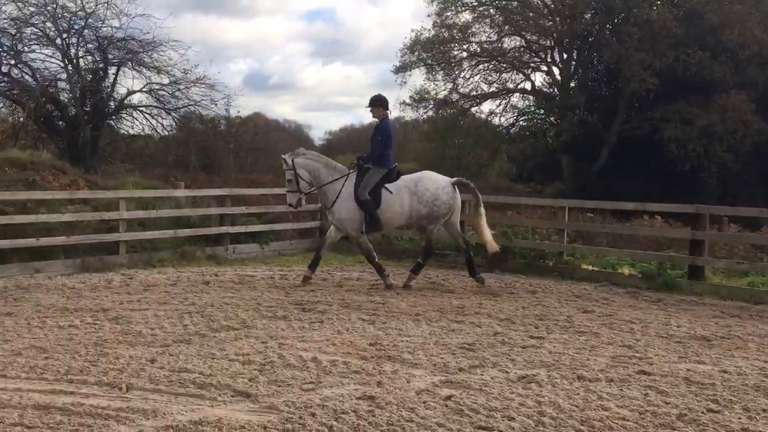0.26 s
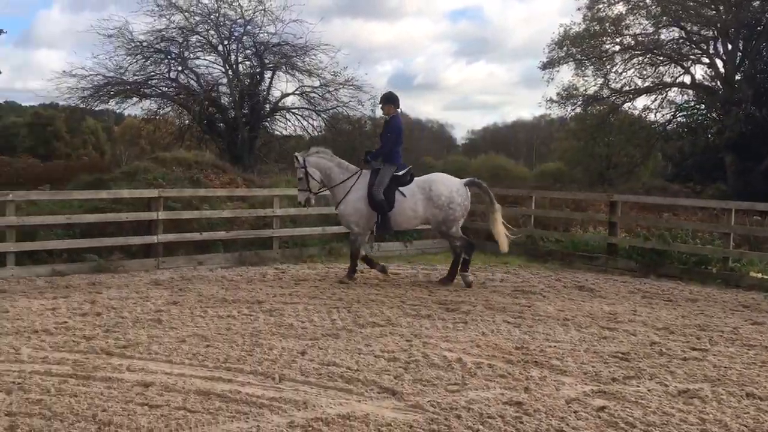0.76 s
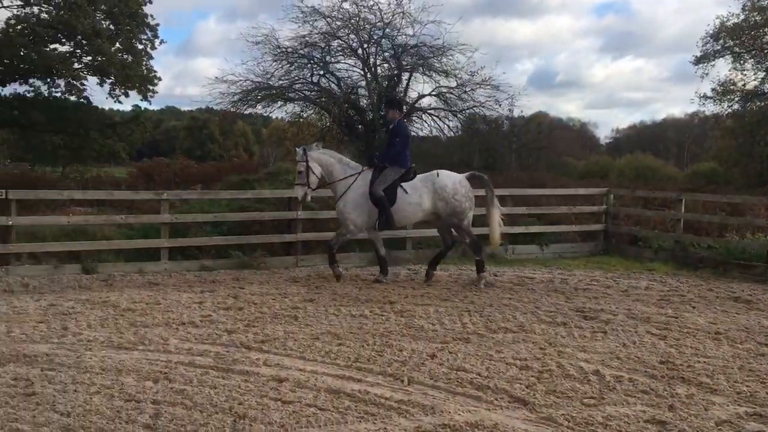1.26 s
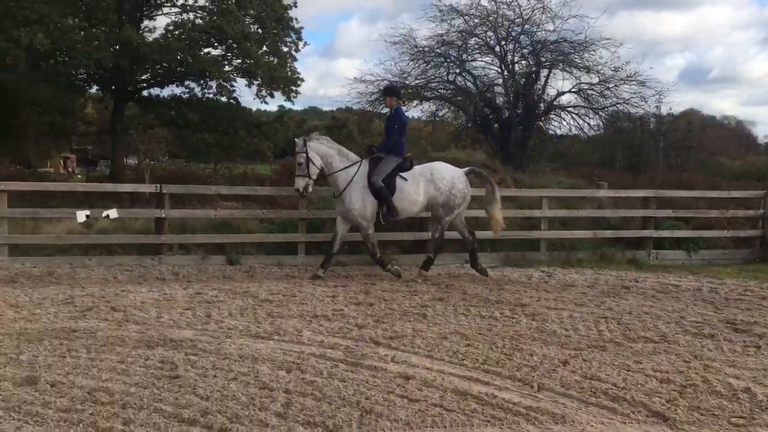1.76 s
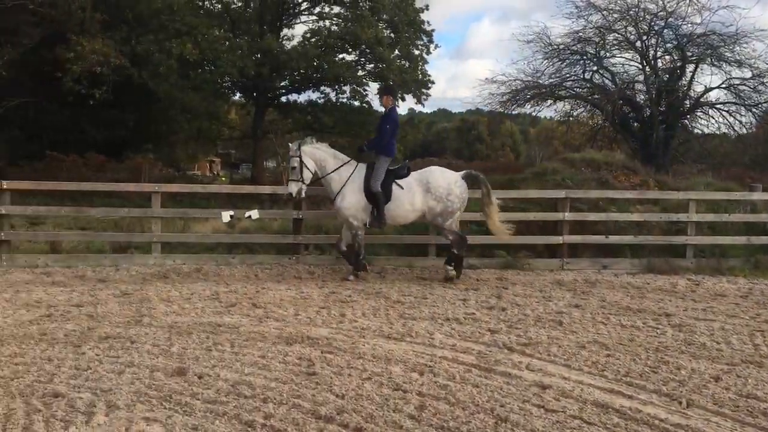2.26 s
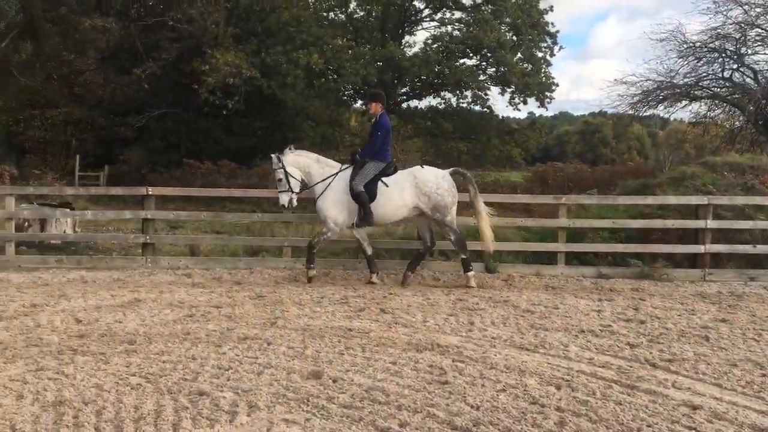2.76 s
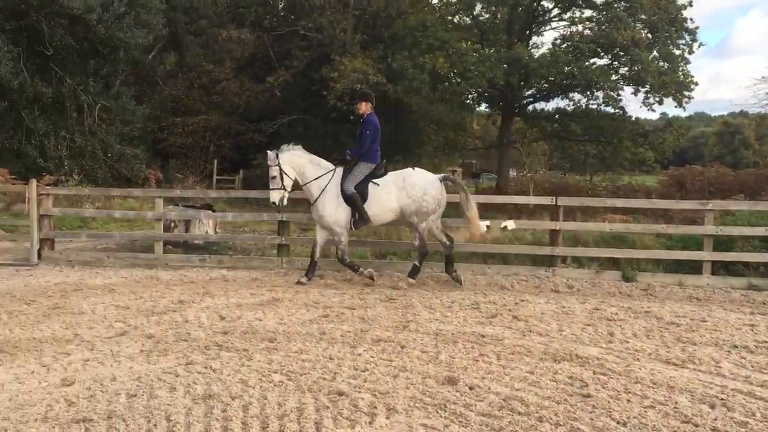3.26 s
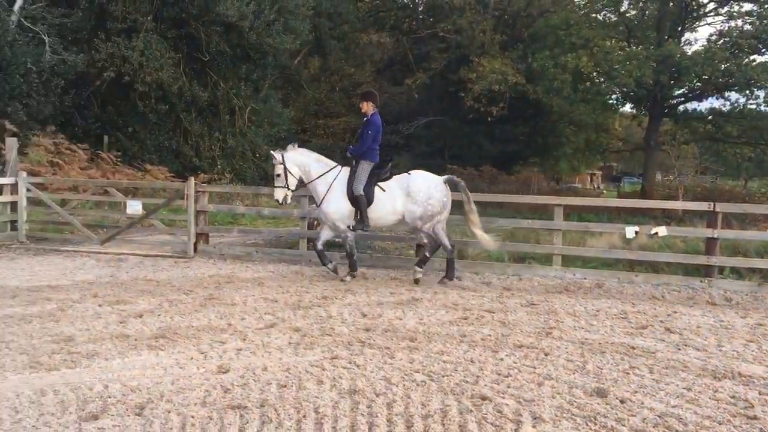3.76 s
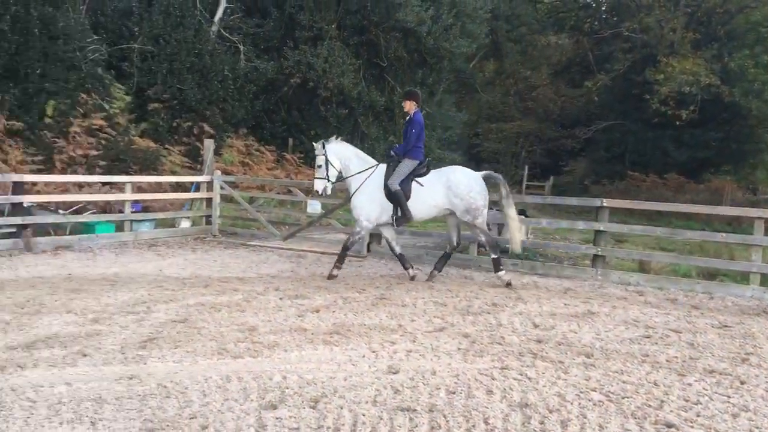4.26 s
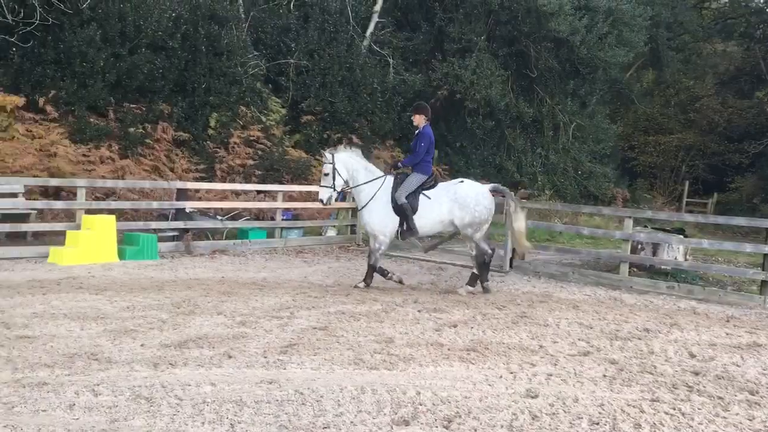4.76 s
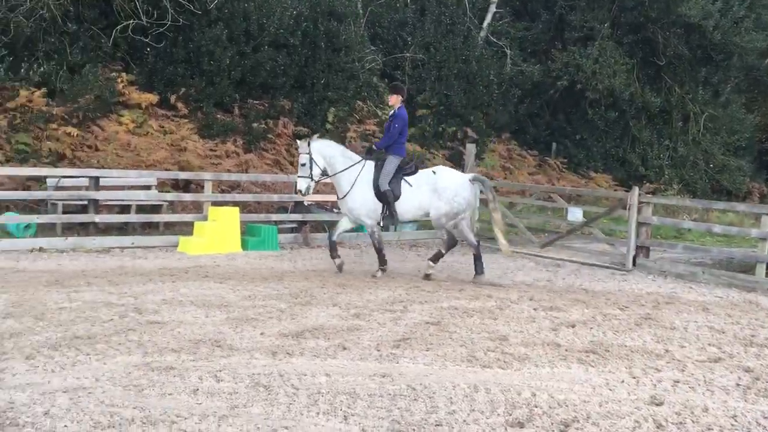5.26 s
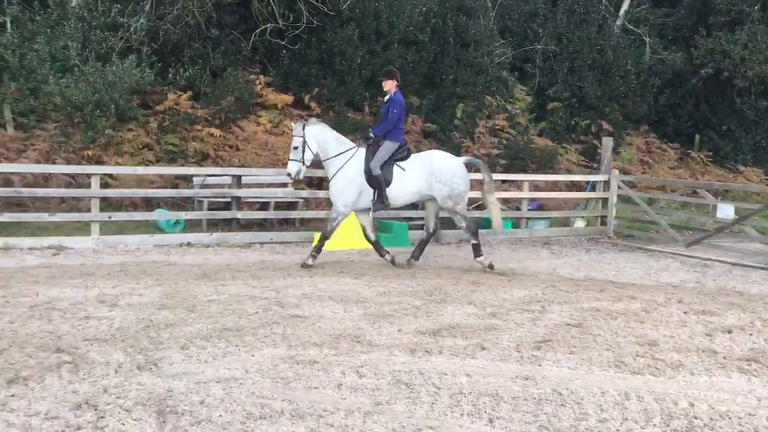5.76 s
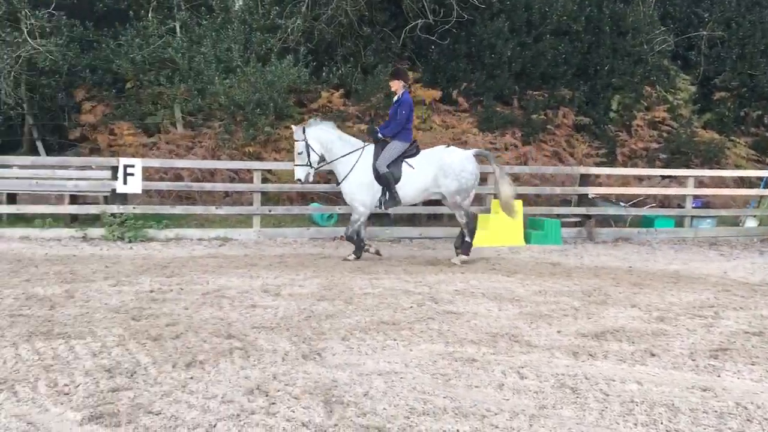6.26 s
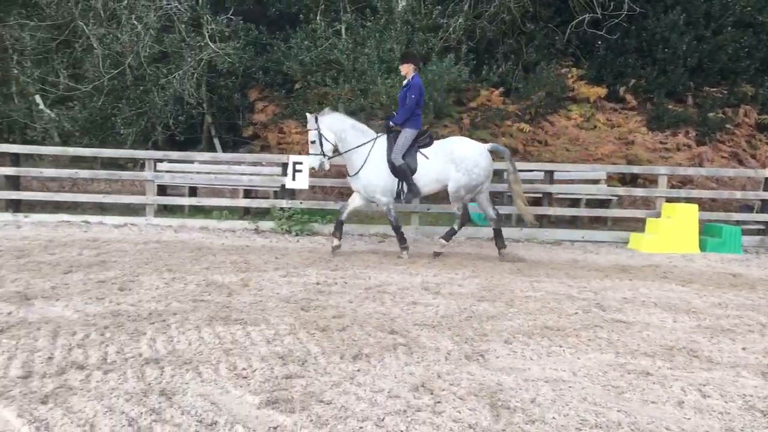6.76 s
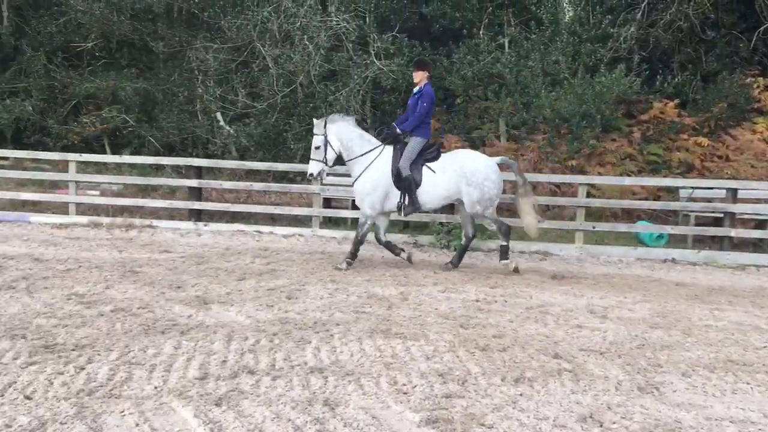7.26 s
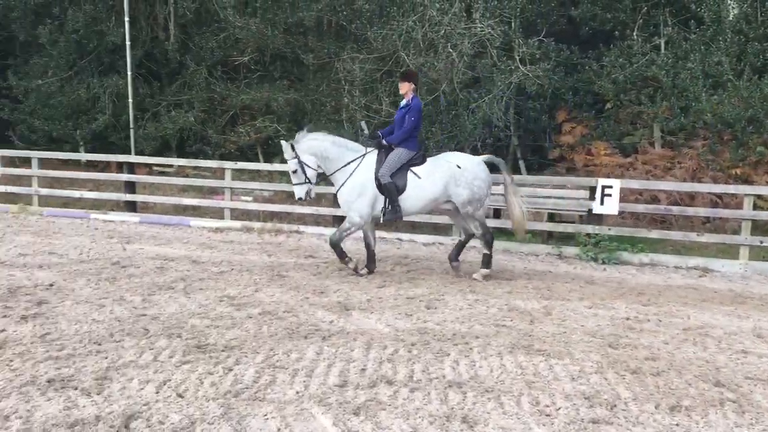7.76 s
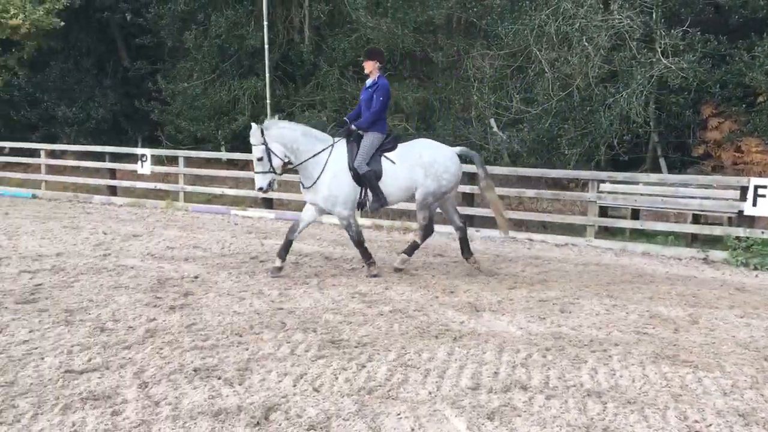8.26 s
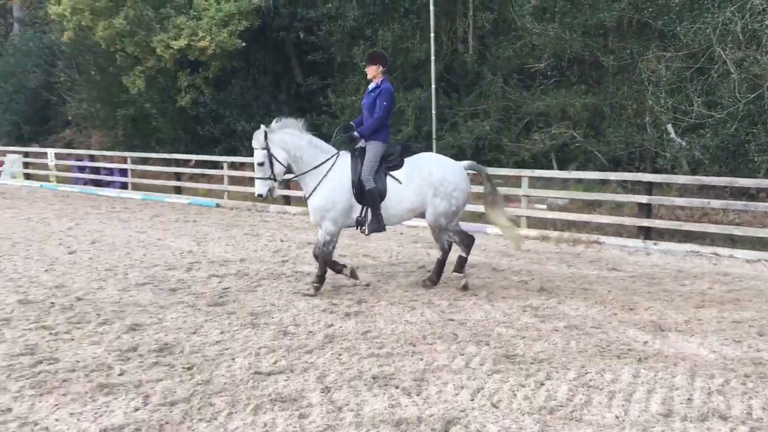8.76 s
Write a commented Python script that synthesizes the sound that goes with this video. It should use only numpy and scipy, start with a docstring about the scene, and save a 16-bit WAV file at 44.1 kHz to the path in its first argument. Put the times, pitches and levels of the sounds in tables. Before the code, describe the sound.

A phone microphone held in the hand hears a quiet open-air arena: muffled low bumps and rubs of fingers very close, a constant thin motor ticking, and farther off the grainy swish of trotting hooves in sand. Occasional tiny tack clicks appear. After a few thin bird chirps, a dull far gunshot booms at one second; another at eight and a half seconds fades slowly through the trees.

```python
"""A horse trots round a sand arena; shaped noise makes the soft swish of its hooves, with small clicks of tack.
A hand-held phone follows it: fingers knock and rub the case with short tones and noise, and the focus
motor rings the case twenty times a second. Two distant gunshots, each a dull click with a short ring and
a boom, roll through the surrounding woods as fading noise. A small bird calls in gliding tones, over open
air and hiss."""
import sys
import numpy as np
from scipy import signal
from scipy.fft import rfft, irfft
from scipy.io import wavfile

SR = 44100
rng = np.random.default_rng(int(sys.argv[2]) if len(sys.argv) > 2 else 0)


def bounce(signal):
    """Save signal as a 16-bit WAV file at the path given by the first command-line argument."""
    frames = np.transpose(np.atleast_2d(signal))
    limited = np.clip(frames, -1, 1)
    pcm = np.round(limited * 32767).astype(np.int16)
    wavfile.write(sys.argv[1], SR, pcm)


N = 397782
HZ = np.fft.rfftfreq(N, 1 / SR)  # frequencies on which all gains are given
EDGE_HZ = 16300  # upper limit of the phone's sound

# tone of skin moving on the case, only its shape counts: [pitch_hz, gain_db]
SKIN_TONE = [(47, -11), (80, 5), (170, -6), (345, -2.5), (450, -7.5), (935, -25.5), (1200, -17.5),
             (1560, -35), (2640, -120)]


def amp(db):
    """Decibels to gain."""
    return 10 ** (np.asarray(db) / 20)


def unit(x):
    """Scales to an average (rms) level of 1."""
    return x / np.sqrt(np.mean(x ** 2) + 1e-20)


def read(points, hz):
    """Reads a table between its points, on a log-frequency axis."""
    f, value = np.transpose(points)
    return np.interp(np.log(hz + 1), np.log(f + 1), value)


def add(mix, s, sound):
    """Mixes a sound in at time s."""
    part = mix[max(round(s * SR), 0):][:len(sound)]
    part += sound[:len(part)]


def clock(length):
    """Sample times over a length in seconds."""
    return np.arange(int(length * SR)) / SR


def noise(gain):
    """Noise of rms 1 with a given gain on HZ."""
    return unit(irfft(rfft(rng.standard_normal(N)) * gain, N))


def drift(rate):
    """A random curve of rms 1; a higher rate in Hz makes it wander faster."""
    return noise(np.exp(-(HZ / rate) ** 2))


def causal(gain, size=2048):
    """The click, of peak 1, that a passive body with this gain on HZ gives when struck."""
    log_gain = irfft(np.log(np.maximum(gain, 1e-5)), N)
    # folding the second half onto the first puts all the sound after the strike
    log_gain[1:N // 2] *= 2
    log_gain[N // 2 + 1:] = 0
    click = irfft(np.exp(rfft(log_gain)), N)[:size]
    return click / abs(click).max()


def bell(centre_hz, width_hz):
    """Gain of one resonance on HZ, with its half width."""
    return 1 / (1 + ((HZ - centre_hz) / width_hz) ** 2)


def swell(s, length, skew):
    """A rise and fall over the whole scene's time; a skew below 1 makes the rise the quicker."""
    out = np.zeros(N)
    shape = np.sin(np.pi * (clock(length) / length) ** skew)
    add(out, s, shape[max(-round(s * SR), 0):])  # what lies before the start is cut off
    return out


def background(air_db=-61, air_vary_db=1, tremor_db=-65, tremor_hz=60, tremor_vary_db=4, hiss_db=-73.5):
    """Open air and the low tremor of the holding hand waver in level; microphone hiss is steady."""
    # tone of the open air, only its shape counts: [pitch_hz, gain_db]
    air_tone = [(20, -39), (65, 4), (103, -1), (181, -7.5), (318, -10), (370, -15), (395, -25.5),
                (584, -13), (1000, -14), (1300, -20), (1690, -17.5), (2730, -34.5), (4500, -38.5),
                (5850, -88), (9900, -120)]
    # tone of the microphone hiss, only its shape counts: [pitch_hz, gain_db]
    mic_tone = [(2500, -6), (6500, 1), (7800, -6), (8800, -1), (11800, 4), (12600, -1), (14000, 0),
                (14850, 7), (15400, -3), (16200, -25)]
    air = amp(air_db + air_vary_db * drift(5.8)) * noise(amp(read(air_tone, HZ)))
    tremor = amp(tremor_db + tremor_vary_db * drift(7.4)) * noise(bell(tremor_hz, 25))
    return air + tremor + amp(hiss_db) * noise(amp(read(mic_tone, HZ)))


def hooves(trot_db=-72.5, drag_extra_db=3.5, beat_vary_db=0.5, scuff_extra_db=1.0, skew=0.73,
           clump_db=3, grit_share_db=-18, grit_hz=2050, grit_width_hz=900, grit_clump_db=6):
    """Each beat swishes through clumpy sand, then a toe drags; deep steps swish louder, some throw bright grit."""
    first_beat_s, beat_s = .1, .364
    land_s, drag_s, drag_lag_s = 0.37, 0.31, .21
    scuff_s, spray_s = 0.084, 0.11
    # tone of the sand, only its shape counts: [pitch_hz, gain_db]
    sand_tone = [(120, 1), (300, 2), (700, -3.5), (1100, 2.5), (1650, 5.5), (2100, -4.5), (2700, -22),
                 (4000, -15.5), (9000, -33)]
    # hooves that push deep into the sand: [start_s, level_db before scuff_extra_db]
    scuffs = [(0.445, -59.5), (2.257, -67), (2.366, -65.5), (2.501, -60.5), (2.587, -65), (2.673, -63),
              (2.744, -65), (2.868, -66), (3.111, -69), (3.232, -66), (3.392, -61.5), (3.486, -62),
              (3.655, -63), (3.736, -67), (3.79, -65), (3.971, -60.5), (4.123, -64.5), (4.197, -65.5),
              (4.302, -64.5), (4.716, -66), (4.85, -60.5), (4.93, -61), (5.122, -65.5), (5.421, -64),
              (5.502, -58.4), (5.609, -63.5), (5.662, -63), (5.814, -63.5), (6.159, -61), (6.281, -60.3),
              (6.574, -64), (6.687, -63.5), (6.873, -68), (7.04, -61), (7.302, -65), (7.771, -59.5),
              (7.849, -62.5), (8.029, -63)]
    # sand thrown up by a toe: [start_s, level_db of the grit]
    sprays = [(.46, -68), (1.91, -69), (2.5, -72), (2.66, -72), (3.39, -70), (4.72, -71), (4.81, -67),
              (5.49, -70), (6.36, -65.5), (7, -62), (7.29, -71), (7.73, -66)]

    beats = np.arange(first_beat_s - beat_s, N / SR, beat_s)
    levels = trot_db + beat_vary_db * rng.standard_normal((len(beats), 2))
    trot = np.zeros(N)
    for s, (land_db, drag_db) in zip(beats, levels):
        trot += amp(land_db) * swell(s, land_s, skew)
        trot += amp(drag_extra_db + drag_db) * swell(s + drag_lag_s, drag_s, skew)
    dig = sum(amp(db + scuff_extra_db) * swell(s, scuff_s, skew) for s, db in scuffs)
    spray = sum(amp(db) * swell(s, spray_s, skew) for s, db in sprays)

    sand = unit(noise(amp(read(sand_tone, HZ))) * amp(clump_db * drift(67)))
    grit = noise(bell(grit_hz, grit_width_hz) ** 2)
    grit = unit(grit * amp(grit_clump_db * np.tanh(drift(160))))
    return np.hypot(trot, dig) * sand + np.hypot(amp(grit_share_db) * trot, spray) * grit


def bumps(soft_db=-52, soft_hz=330, hard_db=-41, hard_hz=620, end_share=0.27, sag_s=0.0031,
          knock_peak_s=0.0036, knock_spread=0.07, thud_hz=61, thud_peak_s=0.0136, thud_lag_s=0.0016,
          scrape_db=-17, scrape_s=0.025):
    """A knock, higher when harder, falls in pitch at once; skin scrapes, then the microphone's bass swings slowly."""
    # bumps of the fingers on the phone: [start_s, knock_db, thud_db of the low swing that follows]
    touches = [(0.033, -44, -48), (0.075, -47, -47), (.091, -49, -47), (0.147, -42.5, -43),
               (0.262, -47.5, -40), (0.37, -57, -42), (0.408, -48.5, -42), (0.487, -48.5, -45),
               (0.555, -50, -40), (1.232, -47, -43), (1.274, -46, -40), (1.329, -52.5, -41.5),
               (1.993, -47.5, -39), (2.01, -47, -54), (2.28, -33.5, -41), (2.311, -41.5, -58),
               (2.65, -50.5, -44.5), (2.768, -41.5, -61), (3.137, -42.5, -39.5), (3.536, -37.5, -37),
               (3.603, -45.5, -40), (4.348, -39, -38), (4.486, -41, -54), (4.496, -40.5, -43),
               (4.514, -43, -46), (4.539, -39.5, -46), (4.587, -37.5, -43), (4.631, -39, -43),
               (4.653, -43.5, -42.5), (4.72, -36, -42), (4.792, -41, -40), (4.845, -42, -41),
               (5.227, -49, -59), (5.326, -47, -46), (5.366, -42, -39.5), (5.561, -38.5, -35),
               (5.628, -45.5, -43), (5.666, -48, -36), (6.46, -46.5, -52), (6.519, -39.5, -38.5),
               (6.673, -39, -39), (6.801, -46, -35.5), (6.872, -42, -47), (6.907, -50, -40),
               (6.99, -55, -42), (7.028, -54, -40), (7.114, -43, -40), (7.157, -44.5, -57),
               (7.198, -41, -38), (7.288, -41.5, -40), (7.43, -39.5, -42), (7.466, -36, -39),
               (7.483, -33.5, -43), (7.563, -41, -42), (7.745, -47.5, -48), (7.848, -44.5, -38),
               (7.858, -45.5, -43), (7.948, -40.5, -49), (7.971, -45.5, -41), (8.036, -41.5, -44),
               (8.05, -40, -46), (8.084, -36, -61)]
    out, contact, t = np.zeros(N), np.zeros(N), clock(0.16)
    skin = noise(amp(read(SKIN_TONE, HZ)))
    chances = rng.standard_normal((len(touches), 3))  # makes every bump a little different
    for (s, knock_db, thud_db), (slack, softness, grip) in zip(touches, chances):
        start_hz = np.interp(knock_db, [soft_db, hard_db], [soft_hz, hard_hz])
        sag = np.exp(-t / (sag_s * np.exp(grip / 2)))
        knock_hz = start_hz * (end_share + (1 - end_share) * sag)
        rise = t / (knock_peak_s * np.exp(knock_spread * softness))
        shape = (rise * np.exp(1 - rise)) ** 3
        add(out, s, amp(knock_db) * shape * np.sin(2 * np.pi * np.cumsum(knock_hz) / SR))

        add(contact, s, amp(knock_db + scrape_db) * np.exp(-t / scrape_s))

        # the swing starts over three times as high and falls to its resting pitch
        swing_hz = thud_hz * np.exp(0.11 * slack) * (1 + 2.37 * np.exp(-t / 0.0042))
        rise = t / thud_peak_s
        shape = (rise * np.exp(1 - rise)) ** 2
        add(out, s + thud_lag_s, amp(thud_db) * shape * np.sin(2 * np.pi * np.cumsum(swing_hz) / SR))
    return out + contact * skin


def case_gain(modes):
    """Gain of the phone's resonances on HZ, their powers added."""
    return np.sqrt(sum((amp(db) * bell(hz, width)) ** 2 for hz, width, db in modes))


def focus_motor(tick_db=-39.0, vary_db=1, jitter_s=.0002, bounce_share=0.33, bounce_s=0.0039, bounce_db=-3,
                rattle_db=-24, settle_db=-26, seat_push_db=-13, seat_every=6, spread_s=.0016,
                seat_hz=2200, seat_width_hz=280, seat_db=-51):
    """Lens steps ring the case, rattle and settle; some bounce, extra pushes come, every sixth seats dully."""
    first_step_s, step_s = .0489, .05
    first_check_s = 1.166  # first of the extra pushes that come once a second
    # resonances of the phone's case: [pitch_hz, half_width_hz, gain_db]
    case_modes = [(1792, 188, 12.5), (2550, 270, -4.5), (4900, 720, -6), (5720, 290, 4), (6770, 370, 0),
                  (8470, 220, -4), (9880, 280, 0.5), (11900, 2190, -3.5)]
    # its highest resonances: [pitch_hz, half_width_hz, gain_db]
    top_modes = [(13000, 900, -5.5), (14800, 900, -13)]
    # single extra pushes of the lens: [start_s]
    nudges = [.065, .265, .366, 2.71, 5.282, 5.482, 8.973]
    # spells in which the lens tends to bounce: [from_s, to_s]
    loose = [(.4, 3.1), (7.5, 8.9)]
    # spells in which the focus hunts, adding a push after every second step: [first_push_s, last_push_s]
    hunts = [(5.916, 6.816), (7.132, 7.332)]

    steps, pushes = np.arange(first_step_s, N / SR, step_s), np.zeros(N)
    chances = rng.random(len(steps))
    varied = rng.standard_normal((len(steps), 2))
    for s, chance, (jitter, size) in zip(steps, chances, varied):
        add(pushes, s + jitter_s * jitter, amp([vary_db * size]))
        if chance < bounce_share and any(first < s < last for first, last in loose):
            add(pushes, s + bounce_s, amp([bounce_db]))
        add(pushes, s + .031, amp([settle_db + size]))
    for s in [*nudges, *np.arange(first_check_s, N / SR)]:
        add(pushes, s, np.ones(1))
    for first, last in hunts:
        for s in np.arange(first, last + step_s, 2 * step_s):
            add(pushes, s, np.ones(1))

    seats, seat = np.zeros(N), amp(seat_db) * causal(bell(seat_hz, seat_width_hz))
    for s in steps[1::seat_every]:
        add(seats, s + .0357, seat)
        add(pushes, s + .0357, amp([seat_push_db]))

    ring = causal(case_gain(case_modes + top_modes))
    # higher pitches start a little later, by spread_s at EDGE_HZ
    delay = np.exp(-1j * np.pi * HZ ** 2 * spread_s / EDGE_HZ)
    ring = irfft(rfft(ring, N) * delay, N)[:len(ring)]
    tick = ring.copy()
    for s in (.0039, .0049, .0079):  # rattles
        add(tick, s, amp(rattle_db) * ring)
    return amp(tick_db) * signal.oaconvolve(pushes, tick)[:N] + seats


def bird(flutter_db=4.0, warble=0.06):
    """Thin whistles flutter in level and glide in pitch; the wider the glide, the more it warbles."""
    # bird notes: [start_s, length_s, first_hz, last_hz, level_db before the flutter]
    notes = [(0.11, 0.063, 4200, 4330, -75), (0.302, 0.074, 4330, 4230, -73.5),
             (0.71, .024, 5500, 5050, -70), (.734, 0.012, 4950, 4150, -68.5),
             (0.748, 0.041, 4220, 3400, -72), (0.84, 0.041, 5900, 4200, -66.5)]
    out, waver = np.zeros(N), drift(150)
    for s, length, first_hz, last_hz, db in notes:
        hz = np.linspace(first_hz, last_hz, int(length * SR))
        hz = hz + warble * (first_hz - last_hz) * waver[round(s * SR):][:len(hz)]
        fade = signal.windows.tukey(len(hz), .6)
        add(out, s, amp(db) * fade * np.sin(2 * np.pi * np.cumsum(hz) / SR))
    return out * amp(flutter_db * np.tanh(drift(90)))


def rubs(rough_db=4, skew=0.46):
    """Skin sticks and slips on the case: a low grumble of uneven level with a little dry hiss."""
    # fingers sliding on the case: [start_s, length_s, level_db before the roughness, hiss_share_db]
    slides = [(0.139, 0.069, -48, -15.5), (5.581, 0.11, -52, -32), (6.89, 0.99, -57.5, -23),
              (7.117, 0.12, -48.5, -26), (7.465, 0.041, -43.5, -15.5), (7.961, 0.036, -48.5, -10),
              (8.427, 0.13, -54, -29)]
    # tone of the dry hiss, only its shape counts: [pitch_hz, gain_db]
    hiss_tone = [(700, -35), (1600, 1.5), (2500, -11), (3500, -14.5), (4800, -13), (8000, -25),
                 (14000, -39)]
    grumble, hiss = noise(amp(read(SKIN_TONE, HZ))), noise(amp(read(hiss_tone, HZ)))
    roughness = amp(rough_db * np.tanh(drift(100)))
    out = np.zeros(N)
    for s, length, db, dry_db in slides:
        out += amp(db) * swell(s, length, skew) * (grumble + amp(dry_db) * hiss)
    return roughness * out


def gunshots(early_t60=0.56, lumpy_db=1.5, build_s=0.0022, boom_hz=66, boom_overtone_hz=115, boom_s=0.0091,
             boom_lag_s=0.0017, thump_hz=320, ring_db=-6.0, ring_s=0.0031, rumble_db=-9, return_s=0.05):
    """A dull blast arrives by several close paths, with one short ring and one boom; trees scatter it back."""
    # [start_s, blast_db before path gain, boom_db, early_echo_db, roll_db, echo_lower_edge_hz, ring_hz]
    shots = [(0.9534, -21.5, -26.5, -39.5, -49, 433, 1030), (8.4938, -18.5, -38, -38.5, -43.5, 290, 662)]
    # tone of the blast after the long way through the air, only its shape counts: [pitch_hz, gain_db]
    blast_tone = [(150, -18.5), (340, 4.5), (490, 3.5), (680, 2.5), (1000, 3), (1320, -1), (1560, 6),
                  (1950, -21), (3000, -29.5), (8000, -83)]
    # ways by which the blast arrives, over the ground and off nearby things: [delay_s, gain]
    paths = [(0, .5), (.0012, .8), (.0028, 1), (.0039, .6)]
    # tone of the woods' echoes, only its shape counts: [pitch_hz, gain_db]
    woods_tone = [(60, 4), (180, -1), (345, 9), (490, -7), (660, 4), (830, -1), (1050, 5), (1300, -0.5),
                  (1600, 2.5), (2000, -12), (2600, -24.5), (4000, -46), (8000, -69)]
    # time the roll takes to fade by 60 dB: [pitch_hz, fade_s]
    woods_fade = [(100, 2.2), (400, 3.6), (1100, 5.74), (1700, 3.2)]
    # stands of trees that return a shot in a lump: [start_s, level_db]
    returns = [(1.005, -44.5), (8.615, -44.5), (8.685, -46.5), (8.725, -45)]

    out, blast, u = np.zeros(N), causal(amp(read(blast_tone, HZ))), clock(.15)
    boom = np.sin(2 * np.pi * boom_hz * u) + np.sin(2 * np.pi * boom_overtone_hz * u)
    boom = np.exp(-u / boom_s) * (boom + .5 * np.sin(2 * np.pi * thump_hz * u))
    ring_shape = (u / ring_s * np.exp(1 - u / ring_s)) ** 2
    for s, blast_db, boom_db, early_db, roll_db, edge_hz, ring_hz in shots:
        for delay, gain in paths:
            add(out, s + delay, gain * amp(blast_db) * blast)
        add(out, s, amp(blast_db + ring_db) * ring_shape * np.sin(2 * np.pi * ring_hz * u))
        add(out, s + boom_lag_s, amp(boom_db) * boom)

        low_cut = HZ ** 2 / np.hypot(HZ ** 2, edge_hz ** 2)
        scatter = noise(amp(read(woods_tone, HZ)) * low_cut) * amp(lumpy_db * drift(30))
        scatter += amp(rumble_db) * noise(np.exp(-(HZ / boom_hz - 1) ** 2))
        # split into short spectra, so that each pitch fades at its own pace
        hz, t, z = signal.stft(scatter, SR, nperseg=512)
        early = amp(early_db - 60 * t / early_t60)
        roll = amp(roll_db - 60 * t / read(woods_fade, hz)[:, None])
        echoes = signal.istft(z * (early + roll), SR, nperseg=512)[1][:N]
        add(out, s, echoes * (1 - np.exp(-np.arange(N) / SR / build_s)))
        out += scatter * sum(amp(db) * swell(at, return_s, 1) for at, db in returns if s < at < s + 1)
    return out


def clicks(burst_s=0.0026, width_hz=700):
    """Buckles and grit give tiny dry clicks: a brief burst of noise through one broad resonance."""
    # small clicks of tack and grit: [start_s, peak_db, ring_hz]
    taps = [(2.883, -48, 1720), (4.817, -44.5, 1630), (5.062, -43.5, 1830), (5.3252, -48, 1100),
            (6.525, -41, 1720), (7.972, -51, 1700)]
    out, t = np.zeros(N), clock(.02)
    for s, db, hz in taps:
        ring = causal(bell(hz, width_hz) ** 2)
        burst = rng.standard_normal(len(t)) * np.exp(-t / burst_s)
        click = signal.fftconvolve(ring, burst)
        add(out, s, amp(db) * click / abs(click).max())
    return out


def scene():
    """All sources at the one microphone."""
    phone = background() + focus_motor() + bumps() + rubs()
    arena = hooves() + clicks() + gunshots() + bird()
    return (phone + arena)[None]


def record(dry, bass_hz=38):
    """The phone cuts the deep bass and everything above its upper limit."""
    bass_cut = signal.butter(4, bass_hz, "high", fs=SR, output="sos")
    cut = signal.sosfilt(bass_cut, dry)
    limit = signal.firwin(511, EDGE_HZ, window=("kaiser", 9), fs=SR)
    return signal.oaconvolve(cut, limit[None], "same")


dry = scene()
out = record(dry)
bounce(out)
```